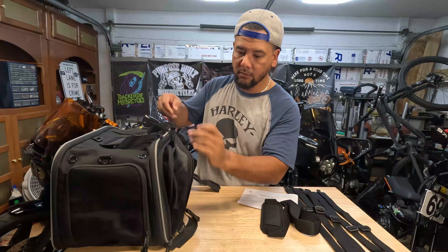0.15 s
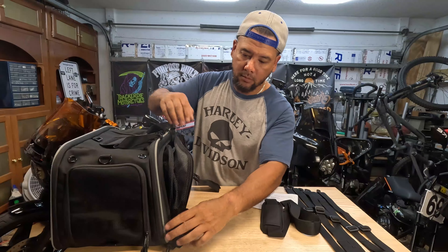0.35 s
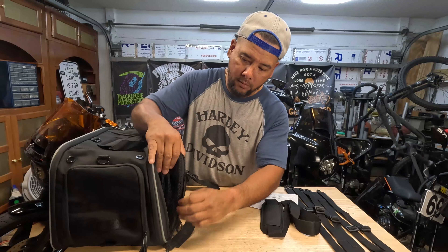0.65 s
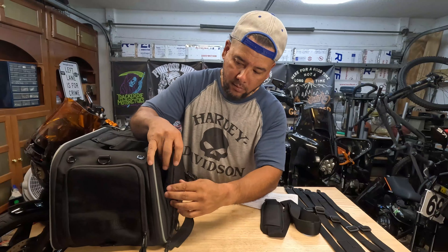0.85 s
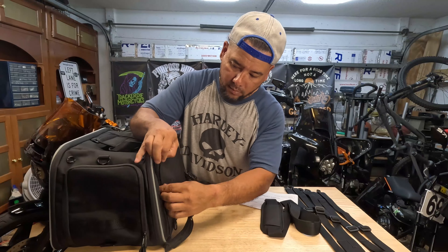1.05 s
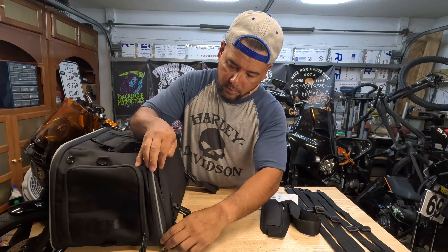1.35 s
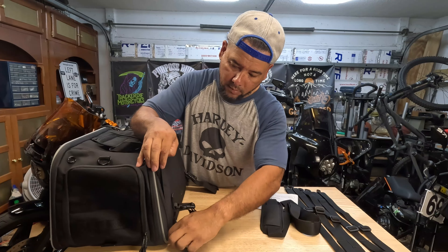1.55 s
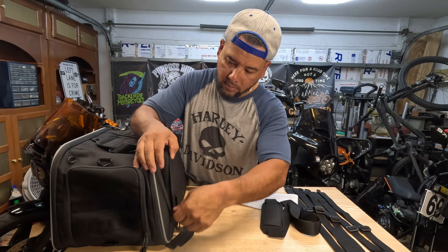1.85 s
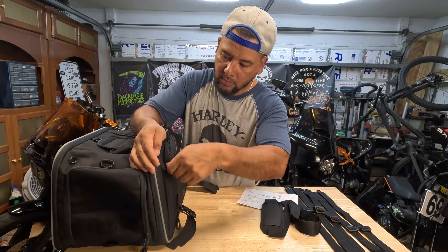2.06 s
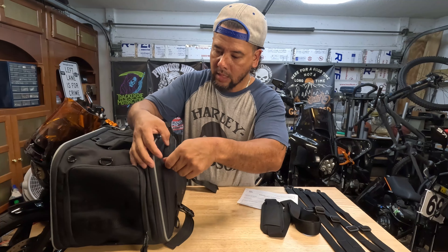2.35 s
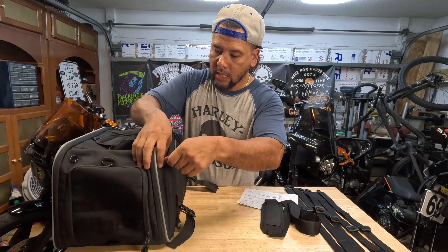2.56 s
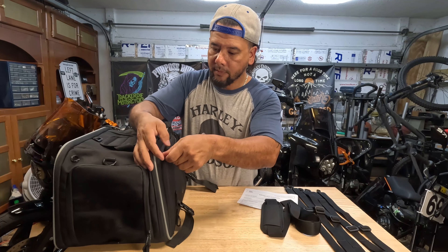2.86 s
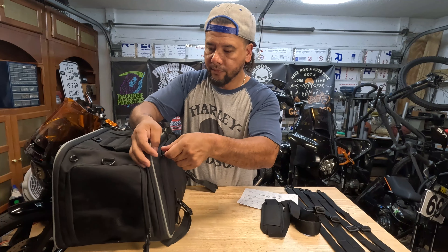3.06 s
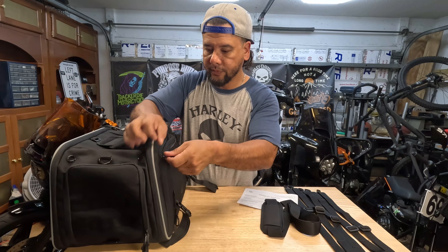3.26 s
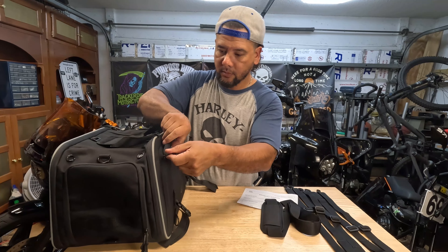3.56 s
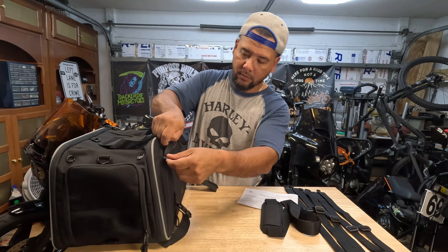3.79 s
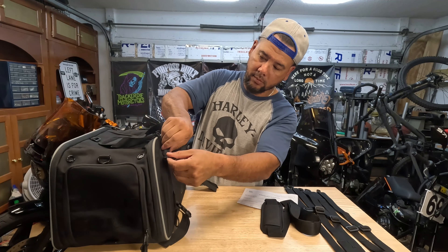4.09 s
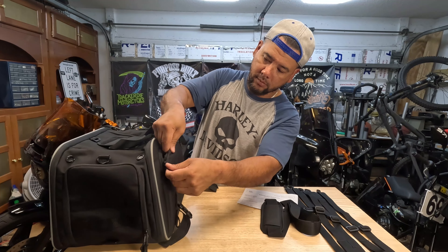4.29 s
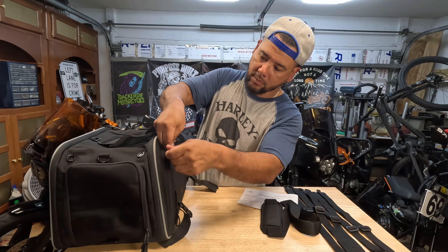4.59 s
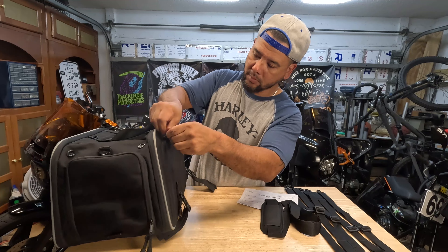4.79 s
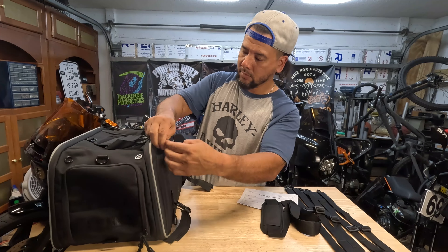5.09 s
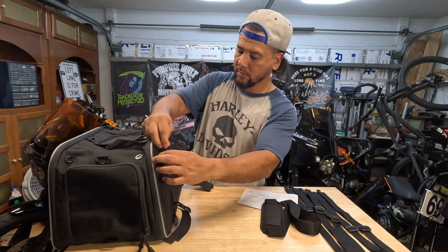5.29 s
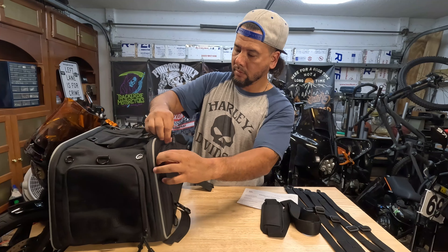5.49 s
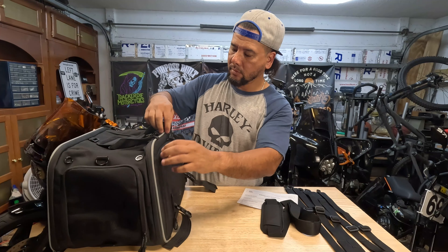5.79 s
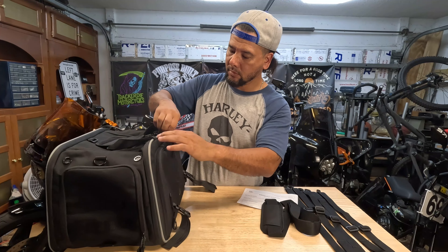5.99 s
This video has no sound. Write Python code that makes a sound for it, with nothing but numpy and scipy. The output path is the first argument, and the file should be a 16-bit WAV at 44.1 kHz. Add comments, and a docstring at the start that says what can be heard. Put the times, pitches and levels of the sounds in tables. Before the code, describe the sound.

A zipper on a stiff fabric bag is pulled in short strokes, with clicks and rustling cloth over a low hum.

```python
"""A zipper on a stiff fabric bag is pulled shut in short strokes in a garage workshop.
The slider bumps over the teeth and makes a buzz that rises in pitch as it speeds up.
Single teeth and snapping folds click, the metal pull tab jingles, and hands rub and fold
the fabric. The zipper echoes briefly, and a motor hums over the room's low rumble."""
import sys
import numpy as np
from scipy import signal
from scipy.io import wavfile

SR = 44100
rng = np.random.default_rng(int(sys.argv[2]) if len(sys.argv) > 2 else 0)


def to_wav(s):
    """Save 16-bit WAV."""
    ch = np.atleast_2d(s).T  # columns
    pcm = np.round(np.clip(ch, -1, 1) * 32767)  # PCM
    wavfile.write(sys.argv[1], SR, pcm.astype(np.int16))


N = 270685


def from_db(db):
    """Turn decibels into a number to multiply a sound by."""
    return 10 ** (np.asarray(db) / 20)


def rms_one(x):
    """Scale a sound so that its average strength (rms) is 1."""
    return x / np.sqrt(np.mean(x ** 2) + 1e-20)


def in_time(rows, t):
    """Read a table at the times t, gliding from row to row."""
    times, *columns = np.transpose(rows)
    return [np.interp(t, times, column) for column in columns]


def at_hz(points, hz):
    """Read a table at the frequencies hz, giving each octave equal room."""
    freqs, values = np.transpose(points)
    return np.interp(np.log(hz), np.log(freqs), values)


def around(rows):
    """Sample numbers from just before a table's first row to just after its last."""
    return np.arange(max(0, round(rows[0][0] * SR) - 1500), min(N, round(rows[-1][0] * SR) + 1500))


def drift(rate_hz):
    """A smooth random wander of size about 1; a higher rate wanders faster."""
    r = np.exp(-40 * np.pi * rate_hz / SR)
    slow = signal.lfilter([1], [1, -2 * r, r * r], rng.standard_normal(N // 20 + 2002))[2000:]
    return np.interp(np.arange(N) / 20, np.arange(len(slow)), rms_one(slow))


def keep_band(x, order, hz, kind):
    """Let the lows, the highs or one band through; a higher order cuts more sharply."""
    return signal.sosfilt(signal.butter(order, hz, kind, fs=SR, output="sos"), x)


def resonate(x, peaks):
    """Colour a sound with the frequencies at which an object likes to shake."""
    out = 0
    for k, (hz, width, db) in enumerate(peaks):
        r = np.exp(-np.pi * width / SR)
        feed = np.array([1, 0, -1]) * (1 - r * r) / 2
        feedback = [1, -2 * r * np.cos(2 * np.pi * hz / SR), r * r]
        out = out + (-1) ** k * from_db(db) * signal.lfilter(feed, feedback, x + 1e-18)
    return out


def ring(knocks, notes):
    """Each knock starts an object's own notes; each fades by 60 dB in its ring time."""
    out = 0
    for k, (hz, db, ring_s) in enumerate(notes):
        r, w = from_db(-60 / (ring_s * SR)), 2 * np.pi * hz / SR
        note = signal.lfilter([0, from_db(db) * np.sin(w)], [1, -2 * r * np.cos(w), r * r], knocks + 1e-18)
        out = out + (-1) ** k * note
    return out


def flickering_noise(spectrum, flicker_db, rate_hz, grain_db=0.0, grains_per_s=1000):
    """Stereo noise in narrow bands that flicker; fibres that snag can make it grainy."""
    # how alike left and right are: f/Hz, likeness (1 = the same)
    likeness = [(100, .99), (250, .97), (1500, .93), (4000, .96), (8000, .95), (9800, .9), (11500, .4),
                (14000, .2)]
    low_hz, top_hz = spectrum[0][0], min(spectrum[-1][0], 16000)
    edges = low_hz * 2 ** np.arange(0, np.log2(top_hz / low_hz), 1 / 3)
    snagged = rng.random(N) < grains_per_s / SR
    snags = snagged * from_db(grain_db * np.minimum(rng.exponential(1, N), 4))
    noise = rng.standard_normal((2, 2, N)) * (1 + signal.lfilter([1], [1, -.97], snags))
    out, together = 0, drift(rate_hz)
    for k, (low, high) in enumerate(zip(edges, edges[1:])):
        mid, side = keep_band(noise[k % 2], 2, [low, high], "band")
        hz = np.sqrt(low * high)
        alike = at_hz(likeness, hz)
        gain = from_db(at_hz(spectrum, hz) + flicker_db * (together + 0.65 * drift(rate_hz)))
        out = out + gain * (np.sqrt(1 + alike) * mid + np.sqrt(1 - alike) * side * [[1], [-1]])
    return rms_one(out)


def slider():
    """Even teeth whine; uneven ones and scraping rasp. Drag is how hard the tape hisses and creases."""
    # one list per pull: t/s, teeth per second, rasp level/dB, whine level/dB, step per overtone/dB
    strokes = [
        [(0.0, 367, -38, -50, -8), (0.062, 322, -48, -59.5, -18), (0.14, 136, -51.5, -72, -5)],
        [(1.82, 131, -54, -56, -7), (1.88, 181, -58, -46.5, 2.5), (1.934, 250, -34.5, -45.5, 0.5),
         (1.974, 367, -29, -49, 1), (2.0, 420, -26.5, -41.5, -1), (2.034, 434, -26.5, -32.5, -0.5),
         (2.054, 430, -29, -37.5, 2.5), (2.09, 343, -31, -33, 1.5), (2.14, 282, -32.5, -42, -1.5),
         (2.182, 256, -35.5, -39, 1), (2.22, 170, -58, -45, -5)],
        [(4.6, 159, -50, -58, -3), (4.66, 195, -39, -56, -5), (4.732, 365, -32, -47, -10),
         (4.78, 288, -35, -53, -8), (4.836, 197, -46, -58, -6), (4.88, 200, -52, -74, -5)],
        [(5.56, 150, -36, -31, 1), (5.582, 255, -36, -50, 2), (5.598, 274, -34, -39.5, -1),
         (5.635, 383, -25.5, -40.5, -12.5), (5.645, 490, -22.5, -39, -7), (5.671, 443, -23.5, -31, -4),
         (5.695, 480, -28, -46, -1), (5.723, 260, -40, -54, -10), (5.77, 390, -74, -60, -4)],
    ]
    # the whine's tones, at 1 to 8 times the tooth rate: level/dB
    tone_levels = [-1.5, 0, 0, -6, -16, -10, -25, -22]
    # how the bag passes the whine: f/Hz, level/dB
    whine_colour = [(150, -1), (250, -7.5), (345, 3), (450, -3.5), (560, 3.5), (750, -9.5), (940, -0.5),
                    (1150, 1.5), (1380, 0.5), (1750, -3), (2200, -16), (2800, 1), (3700, -20)]
    # where the bag shakes under the slider: f/Hz, width/Hz, level/dB
    bag_body = [(168, 46, 4.5), (308, 143, 4.5), (573, 86, 2.5), (905, 29, 2.5), (1335, 400, 0),
                (1810, 500, -1), (2850, 1760, -7.5), (3520, 320, -3.5), (6500, 4000, -22)]
    rasp, whine, drag = np.zeros(N), np.zeros(N), np.zeros((2, N))
    wobble, noise, strength = drift(150), rng.standard_normal(N), rng.standard_normal(N)
    waver_db = [2.5 * drift(40) for _ in tone_levels]
    for rows in strokes:
        i = around(rows)
        t = i / SR
        tooth_hz, rasp_db, whine_db, step_db = in_time(rows, t)
        # a slow slider catches the teeth less evenly
        teeth_passed = np.cumsum(tooth_hz * (1 + 7 / tooth_hz * wobble[i])) / SR
        new_tooth = np.diff(np.floor(teeth_passed), prepend=0)
        bumps = new_tooth * from_db(2 * strength[i]) * np.sqrt(SR / tooth_hz)
        scrape = 3.08 * noise[i] * np.exp(-3 * (teeth_passed % 1))
        fade = np.clip(np.minimum(t - rows[0][0], rows[-1][0] - t) / .02 + .5, 0, 1)
        rasp[i] += fade * from_db(rasp_db - 7.5) * (0.3 * bumps + 0.69 * scrape)
        for k, db in enumerate(tone_levels):
            colour_db = at_hz(whine_colour, (k + 1) * tooth_hz)
            gain = from_db(whine_db + db + step_db * k + colour_db + waver_db[k][i] - step_db)
            whine[i] += fade * np.sqrt(2) * gain * np.sin(2 * np.pi * (k + 1) * teeth_passed + k * k)
        hiss_db = rasp_db - 22 + 3.5 * np.log2(tooth_hz / 400)   # faster pulls hiss more
        drag[:, i] += fade * from_db([hiss_db, rasp_db - 10.5])
    return resonate(rasp, bag_body) / np.std(resonate(noise, bag_body)), whine, drag


def hands(drag):
    """Palms and the slider's drag make the nylon hiss and crease."""
    # touches: start/s, end/s, rubbing level/dB, creasing level/dB, change from start to end/dB
    touches = [(0.0, 0.182, -70, -71, 10), (0.214, 0.288, -57, -56, -19), (0.38, 0.557, -73, -59, 3.5),
               (0.656, 0.779, -52, -54.5, -1), (0.785, 0.91, -53.5, -50, 1.5),
               (0.921, 1.083, -48.5, -49.5, 4.5), (1.096, 1.266, -53.5, -48.5, -2),
               (1.463, 1.566, -63.5, -73, 5.5), (1.562, 1.753, -62, -46, -9.5),
               (1.752, 1.918, -60.5, -52, 4), (2.24, 2.399, -62, -51.5, -2.5),
               (2.451, 2.628, -48.5, -50.5, 4), (2.632, 2.797, -58, -53.5, 4),
               (2.808, 2.946, -49, -46.5, -3.5), (2.96, 3.236, -61.5, -56.5, 1),
               (3.269, 3.391, -55, -54.5, 3), (3.401, 3.484, -57, -50.5, -6.5),
               (3.585, 3.852, -68.5, -62, 12), (3.86, 4.035, -62, -57, 1.5), (4.141, 4.198, -55.5, -62, 9),
               (4.207, 4.29, -60, -57.5, 1), (4.281, 4.5, -57.5, -57.5, 2), (4.558, 4.932, -70, -58.5, 5),
               (4.932, 5.15, -55, -48.5, 2.5), (5.18, 5.359, -64.5, -57.5, 0),
               (5.36, 5.465, -53.5, -55.5, -2.5), (5.511, 5.63, -60, -48, -2.5),
               (5.68, 5.828, -64, -41, -15), (5.882, 5.961, -61.5, -56, 15.5),
               (5.978, 6.153, -52.5, -55, -7.5)]
    # tone colour of rubbing: f/Hz, level/dB
    rub_colour = [(1200, -20), (2200, -7), (3300, -2), (5000, -1), (7000, 0), (9000, -1), (11500, -9),
                  (15500, -20)]
    # tone colour of creasing: f/Hz, level/dB
    crease_colour = [(500, -0.5), (800, -10.5), (1050, -4), (1500, -1), (2000, -5), (2900, -3), (4200, -13),
                     (7000, -11.5)]
    land_s, lift_s = .015, .04   # a hand lands quickly and lifts more slowly
    gain = drag.copy()
    for start, end, rub_db, crease_db, change_db in touches:
        rows = [(start, rub_db, crease_db), (end, rub_db + change_db, crease_db + change_db)]
        i = around(rows)
        contact = np.clip(np.minimum((i / SR - start) / land_s, (end - i / SR) / lift_s) + .5, 0, 1)
        gain[:, i] += contact * from_db(in_time(rows, i / SR))
    settle = np.exp(-1 / (0.044 * SR))   # the cloth rustles on briefly after the hand stops
    gain = np.maximum(gain, 0.42 * signal.lfilter([1 - settle], [1, -settle], gain))
    rub = flickering_noise(rub_colour, flicker_db=1.24, rate_hz=60, grain_db=3, grains_per_s=78)
    crease = flickering_noise(crease_colour, flicker_db=3, rate_hz=9.6, grain_db=.5, grains_per_s=130)
    return gain[0] * rub + gain[1] * crease


def bending_panels():
    """The bag's soft panels make a lumpy rumble as they bend."""
    # how strongly they bend: t/s, level/dB
    folds = [(0.0, -30.5), (0.24, -53.5), (0.53, -50), (1.08, -42), (1.42, -51), (1.61, -52.5),
             (2.1, -41.5), (2.39, -46.5), (3.04, -44), (3.57, -51), (3.79, -40.5), (4.25, -51.5),
             (4.6, -42), (4.79, -44), (5.4, -51), (5.61, -49), (5.81, -45.5), (6.14, -43.5)]
    # tone colour of the panels: f/Hz, level/dB
    colour = [(41, -47), (70, 5.5), (113, 7), (146, 3.5), (333, -4.5), (408, -13), (792, -28.5), (900, -21),
              (1170, -74), (1980, -120)]
    gain = from_db(in_time(folds, np.arange(N) / SR)[0])
    return gain * flickering_noise(colour, flicker_db=1.5, rate_hz=15)


def room_tone():
    """A motor hums with a slight waver over low rumble and faint air noise."""
    # peaks of the room's rumble: f/Hz, width/Hz, level/dB
    rumble_peaks = [(26.6, 3.3, 8.5), (43.3, 11.2, 11), (52.2, 13.3, 2.5), (88.5, 11.5, -5.5),
                    (159, 15.2, -11.5)]
    # tone colour of the air: f/Hz, level/dB
    air_colour = [(150, -51), (260, -2), (450, -32), (800, -20), (1300, -11.5), (2000, -19.5),
                  (5000, -22.5), (9000, -25), (15000, -47)]
    hum_db = -40.5 + 1.8 * drift(1.23)
    hum_hz = 58.4 + 1.08 * drift(2.56)
    hum = np.sqrt(2) * from_db(hum_db) * np.sin(2 * np.pi * np.cumsum(hum_hz) / SR)
    low_noise = resonate(rng.standard_normal((2, N)), rumble_peaks)
    mid, side = resonate(low_noise, [(58.5, 122, 0)])
    rumble = rms_one(mid + from_db(-26) * side * [[1], [-1]])
    air = flickering_noise(air_colour, flicker_db=3.5, rate_hz=7.1)
    return hum + from_db(-39.5) * rumble + from_db(-61.5) * air


def clicks():
    """Each click is a sharp contact that rattles the slider, a bright tick and a soft panel thud."""
    # single teeth and snapping folds: t/s, clack level/dB, then crack/dB, tick/dB, thud/dB added to it
    snaps = [(0.196, -47, 0, 1, -4), (0.244, -39, -11, -7, -12), (0.34, -45, 0, -4, -17),
             (0.39, -39, -25, -2, -9), (0.408, -38.5, -8, 0, -10), (0.431, -42, -1, -2, -8),
             (0.661, -49, -11, -12, -13), (0.714, -41.5, -7, -4, -17), (0.987, -50, -8, -12, 4),
             (1.047, -47, 10, -10, 5), (1.098, -46, -15, -15, 4), (1.126, -51.5, -15, -15, 6.5),
             (1.239, -45, -14, -2, 2.5), (1.485, -50, -22, 4, -24), (1.566, -21, 2, -37, -20),
             (1.587, -27, -3, -30, -11.5), (1.599, -32, -29, -33, -3.5), (1.62, -30, -24, -30, -11),
             (1.664, -40.5, -18, -23, 0.5), (2.253, -33.5, -20, -18, -3), (2.278, -36, -33, -25, 3.5),
             (2.314, -41.5, -24, -18, -11), (2.333, -38, -9, -3, -20), (2.459, -62, -13, 6, -16),
             (2.761, -39.5, -21, -13, -29), (2.814, -43, -23, -4, 2.5), (3.038, -31, -13, -19, -6),
             (3.085, -31.5, -14, -4, -0.5), (3.799, -33.5, -29, -28, -2.5), (3.852, -28.5, -32, 8.5, 1),
             (3.994, -35.5, -30, -32, -11), (4.297, -48.5, 5, 6, 3), (4.353, -41.5, 2.5, -2, 2),
             (4.56, -51.5, 10, -20, 13), (4.627, -39.5, -15, -22, -0.5), (4.815, -37.5, -3, -11, -10),
             (4.937, -65, -5, -2, -21), (4.956, -26, -9.5, -38, -20), (4.975, -23.5, -9, -38, -20),
             (4.996, -31.5, -26, -13, -7), (5.019, -37, -15, -11, 0.5), (5.067, -29, 1.5, -7, -7),
             (5.084, -34.5, -29, -6, 0), (5.104, -40, -15, 1, -4), (5.417, -47.5, 0, 0, 5),
             (5.443, -44, 1.5, 4, 1.5), (5.515, -38, 0.5, -9, 0), (5.54, -28, -12, -23, -8),
             (5.558, -25.5, -11, -29, -36), (5.873, -42, -9, 0.5, -7), (5.91, -39, 6.5, 3, -15),
             (6.125, -44, -5, 3, 10)]
    # the slider's low ring: f/Hz, width/Hz, level/dB
    clack_peaks = [(1010, 640, 2), (1315, 456, 5), (1784, 415, -2)]
    # the slider's high ring: f/Hz, width/Hz, level/dB
    crack_peaks = [(2640, 590, -1), (3430, 860, 0.5), (3550, 470, 0.5)]
    # the bright tick: f/Hz, width/Hz, level/dB
    tick_peaks = [(4050, 4200, -6.5), (6230, 1330, -0.5), (7180, 690, -2.5), (8800, 2400, -25)]
    # the panel's own notes: f/Hz, level/dB, ring time/s
    thud_notes = [(152, 0, 0.082), (215.4, 3.5, 0.075), (324, 5, 0.067), (364.4, 5, 0.03),
                  (583.5, 3.5, 0.026)]
    rows = snaps + creeping_teeth()
    hits, pushes = np.zeros((3, N)), np.zeros(N)
    length = 4000
    t = np.arange(length) / SR
    bursts = rng.standard_normal((len(rows), 3, length))
    bursts[:, :, 8] = 3.5   # first contact
    rise_s, fade_s = .00012, np.array([[.03], [.022], [.025]])
    shape = (1 - np.exp(-t / rise_s)) * from_db(-60 * t / fade_s)
    shape += from_db(-24.5 - 60 * t / 0.54) * (1 - t / t[-1])   # loose parts rattle on
    for (start, db, crack_db, tick_db, thud_db), burst in zip(rows, bursts):
        i = round(start * SR)
        gains = from_db(db + np.array([[0], [crack_db], [tick_db]]))
        hits[:, i:i + length] += (gains * burst * shape)[:, :N - i]
        pushes[i] += from_db(db + thud_db)
    clack = from_db(13.5) * resonate(hits[0], clack_peaks)
    crack = from_db(17) * resonate(hits[1], crack_peaks)
    tick = from_db(9) * resonate(hits[2], tick_peaks)
    pushes = np.convolve(pushes, np.hanning(70) / 25)[:N]   # each push lasts about 1.5 ms
    return keep_band(clack + crack + tick, 2, 850, "high") + ring(pushes, thud_notes)


def pull_tab():
    """The small metal tab bounces twice at each knock and rings briefly."""
    # knocks on the tab: t/s, relative level/dB
    jingles = [(0.41, -45.5), (1.624, -48), (3.039, -47.5), (3.0844, -50), (4.9535, -67), (4.966, -52),
               (4.9794, -51), (4.998, -42), (5.1035, -32), (5.1134, -49), (5.166, -53)]
    # the tab's own notes: f/Hz, level/dB, ring time/s
    tab_notes = [(7300, -1, .008), (7900, -1, .007), (11900, -9, .008), (13600, -12, .007)]
    knocks = np.zeros(N)
    for (start, db), (gap, softer) in zip(jingles, rng.random((len(jingles), 2))):
        knocks[round(start * SR)] += from_db(db + 1)
        knocks[round((start + .001 + .002 * gap) * SR)] += from_db(db + 12 - 3 * softer)
    return ring(knocks, tab_notes)


def creeping_teeth():
    """Rows for clicks(): a slow pull over ten teeth that gets quicker, louder and duller."""
    start_s, gap_s, count = 4.3705, .0163, 10
    tooth = np.arange(count)
    late, harder = rng.standard_normal((count, 2)).T
    times = start_s + (gap_s - .00014 * tooth) * tooth + .001 * late
    clack_db = -49 + 1.1 * tooth + 1.5 * harder
    crack_db, tick_db, thud_db = 4 - tooth, -2 - tooth, 7 - tooth
    return list(zip(times, clack_db, crack_db, tick_db, thud_db))


def garage_echo(x):
    """Sound bounces between the walls on six paths a side, weaker and duller on every round."""
    echo_s, wall_cut_hz = .33, 6500
    for lag in (61, 113, 197):   # all-pass filters scatter the echo without changing its colour
        taps = np.zeros(lag + 1)
        taps[[0, -1]] = 1, -.6
        x = signal.lfilter(taps[::-1], taps, x + 1e-18)
    out = np.zeros((2, N))
    dull = np.exp(-2 * np.pi * wall_cut_hz / SR)
    for k, lag in enumerate((rng.uniform(.009, .032, 12) * SR).astype(int)):
        loop, state = x.copy(), [0.]
        gain = from_db(-60 * lag / SR / echo_s)
        for i in range(lag, N, lag):
            back, state = signal.lfilter([gain * (1 - dull)], [1, -dull], loop[i - lag:i], zi=state)
            loop[i:i + lag] += back[:N - i]
        out[k % 2] += (loop - x) * (-1) ** (k // 2)
    return out


def scene():
    """The bag lies a little to the right; the zipper echoes in the room."""
    rasp, whine, drag = slider()
    zipper = rasp + clicks()
    tones = whine + pull_tab()
    # thin tones echo less than clicks; soft clutter soaks up the echo's bass
    echo = garage_echo(keep_band(zipper + from_db(-8) * tones, 1, 200, "high"))
    shared = echo.mean(axis=0)   # close microphones hear most of the echo alike, the bass above all
    apart = keep_band(echo - shared, 1, 900, "high")
    fabric = hands(drag) + bending_panels()
    bag = zipper + tones + from_db(-8.5) * shared + from_db(-11.5) * apart + fabric
    return bag * from_db([[-.6], [.6]]) + room_tone()


def record(dry):
    """The microphones soften the treble and cut the very top; the right is fuller, the left brighter."""
    soften_hz, cutoff_hz = 9000, 15600
    main = signal.sosfilt(signal.cheby1(4, 1, soften_hz, fs=SR, output="sos"), dry)
    top = keep_band(dry, 2, [11000, 13300], "band")
    low = keep_band(main, 1, 4000, "low")
    out = low * from_db([[-.35], [.35]])
    out += (main - low) * from_db([[1.5], [-1.5]])
    out += top * from_db([[-8], [-13]])
    return signal.sosfilt(signal.cheby2(12, 70, cutoff_hz, fs=SR, output="sos"), out)


dry = scene()
out = record(dry)
to_wav(out)
```